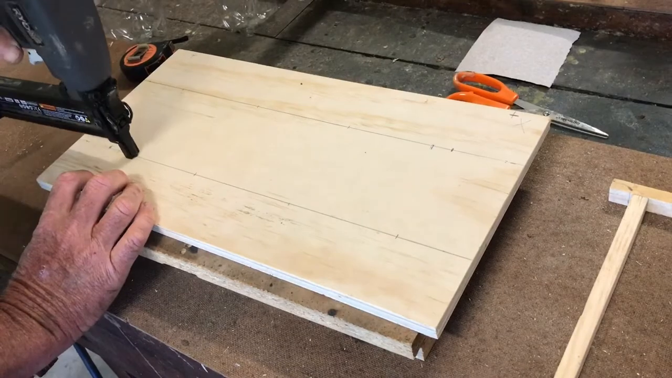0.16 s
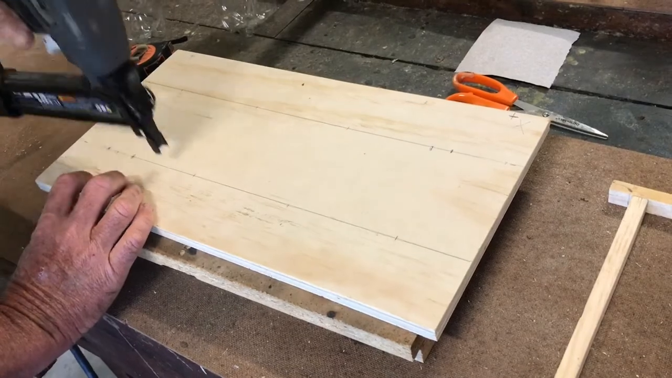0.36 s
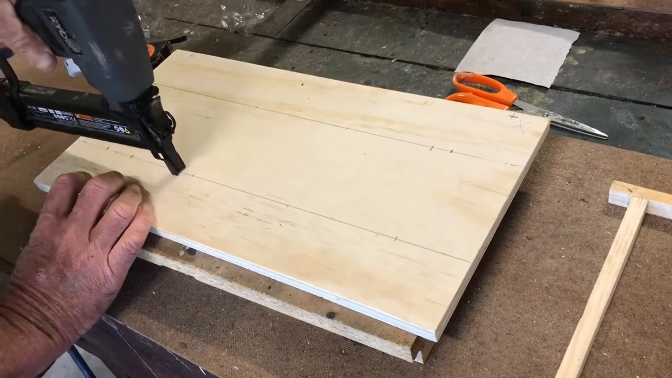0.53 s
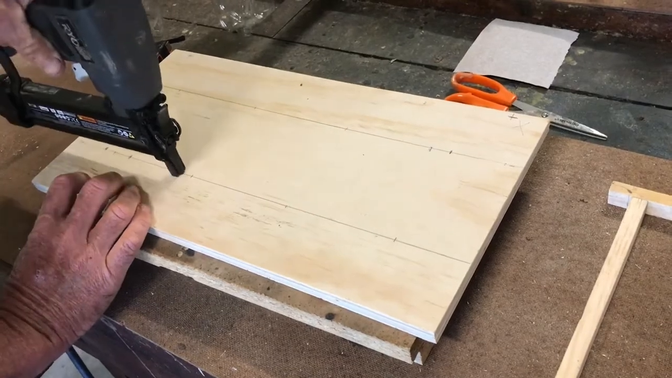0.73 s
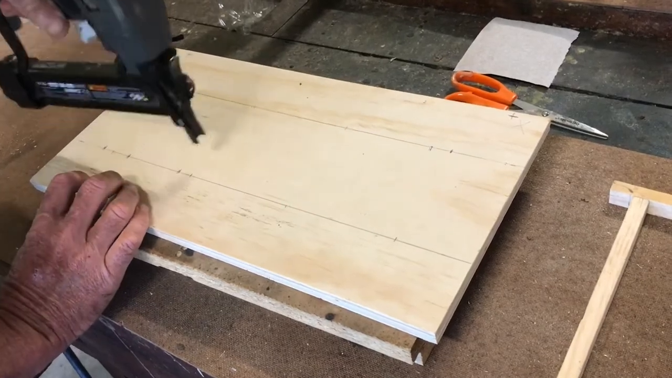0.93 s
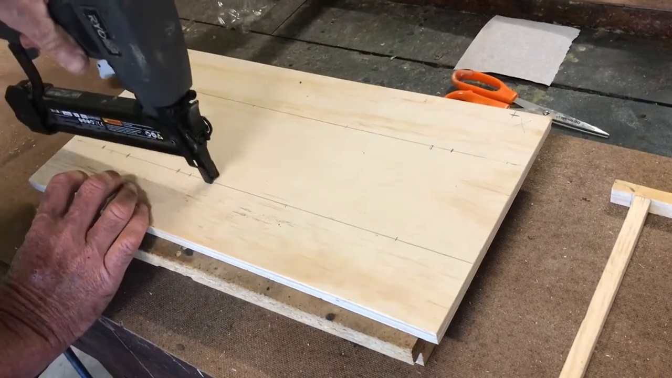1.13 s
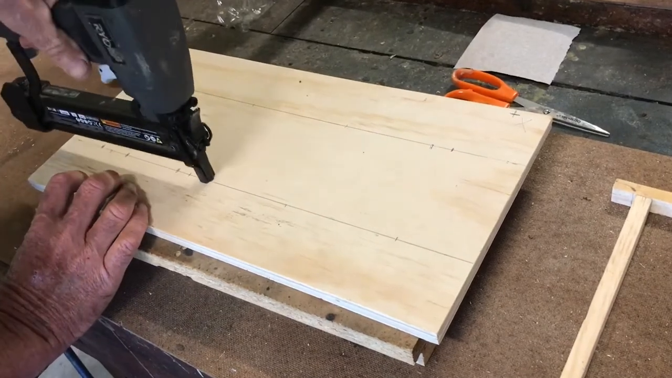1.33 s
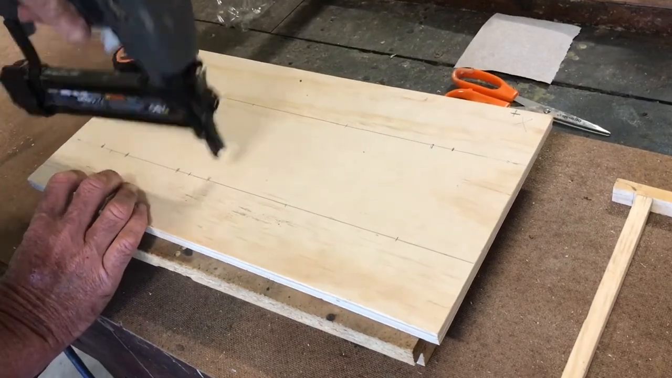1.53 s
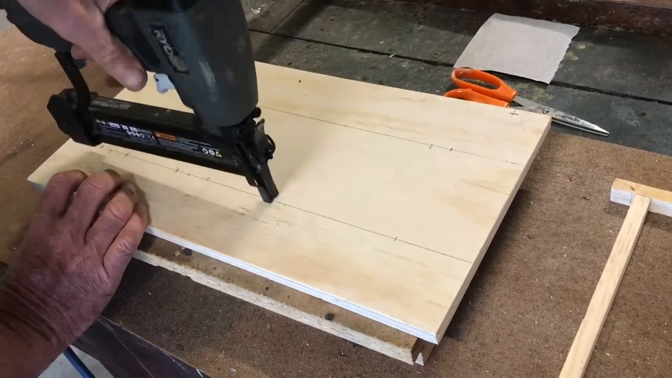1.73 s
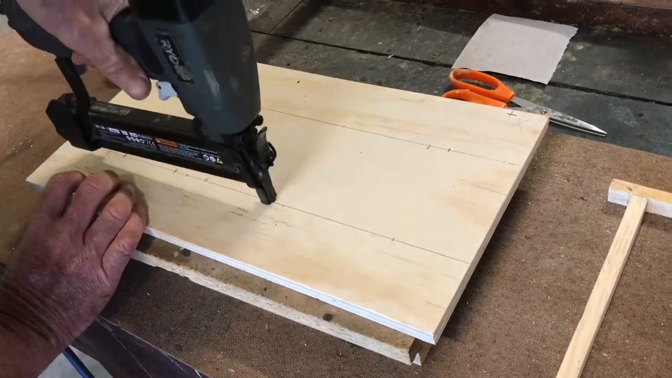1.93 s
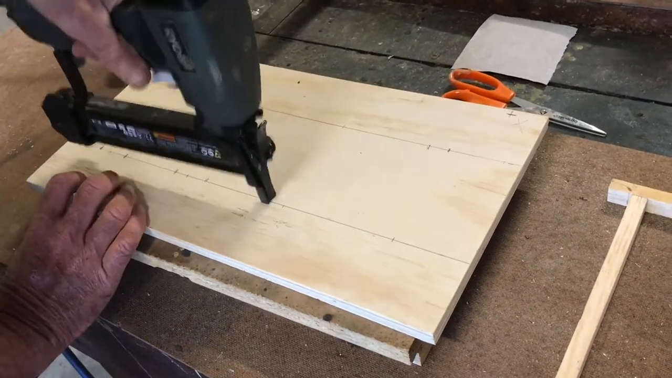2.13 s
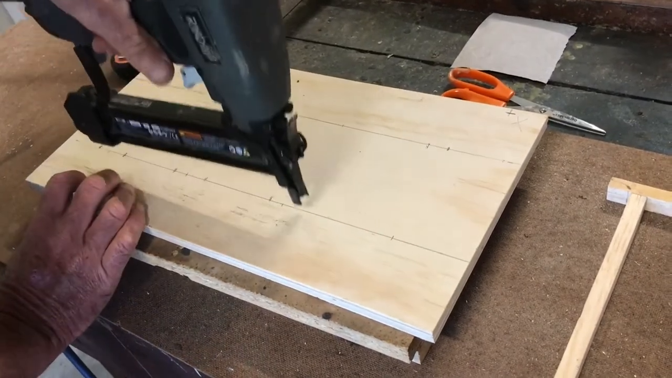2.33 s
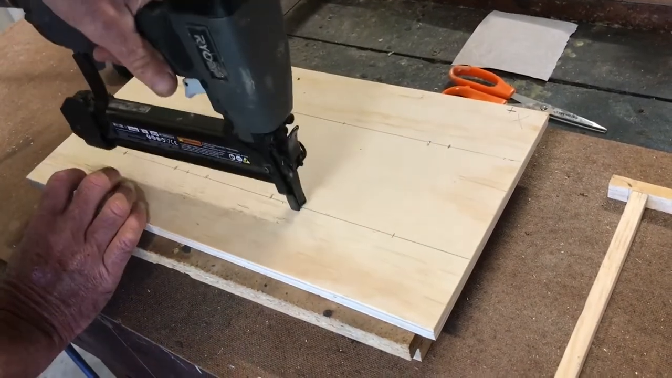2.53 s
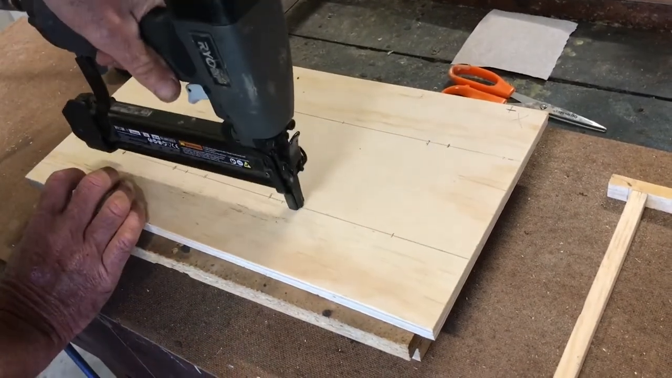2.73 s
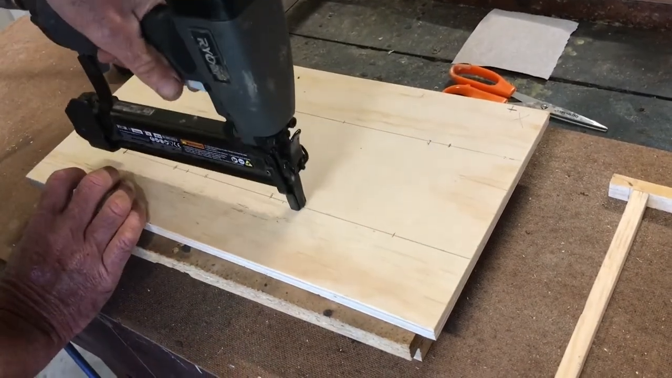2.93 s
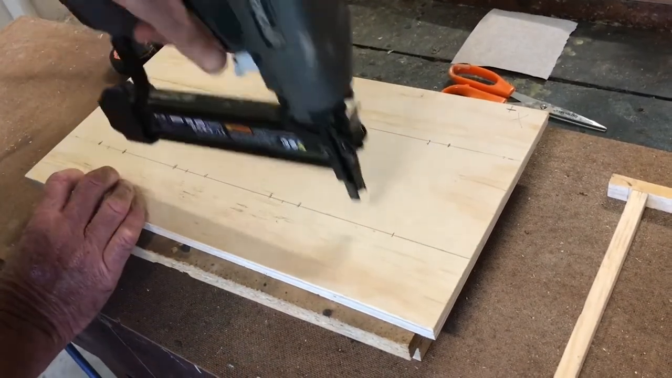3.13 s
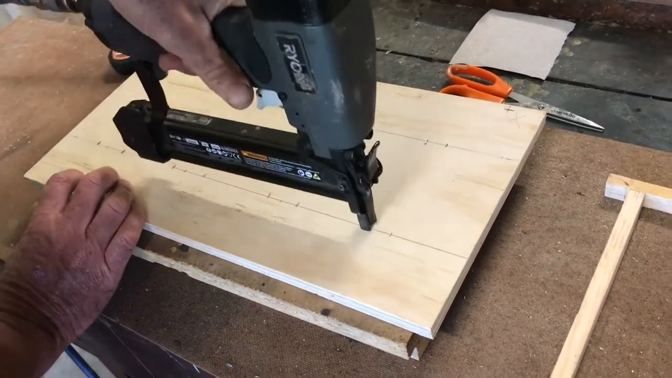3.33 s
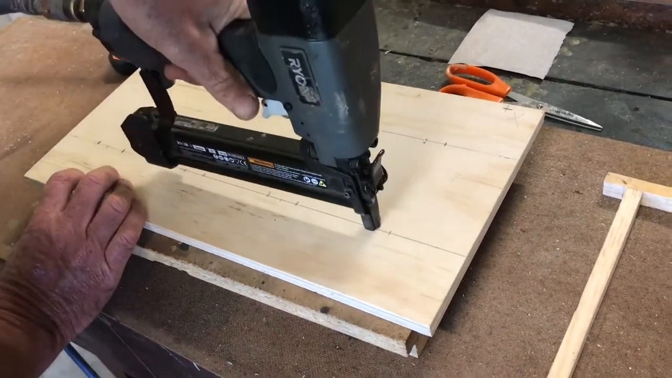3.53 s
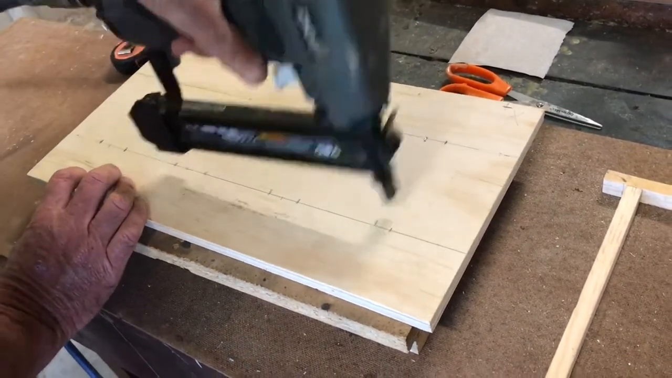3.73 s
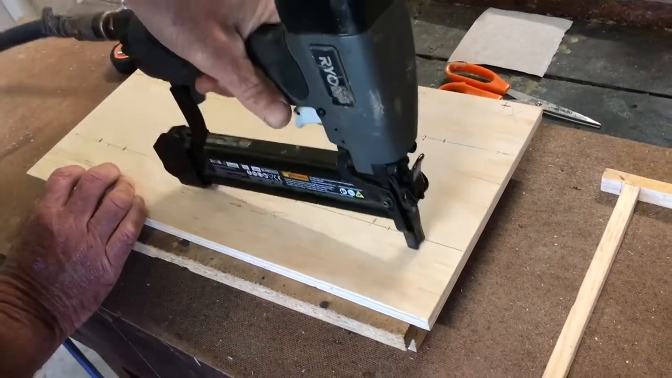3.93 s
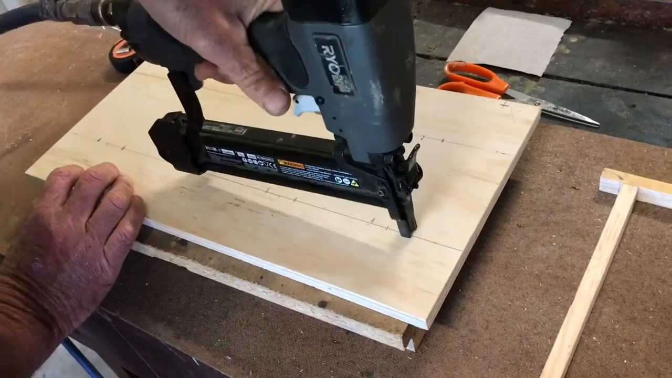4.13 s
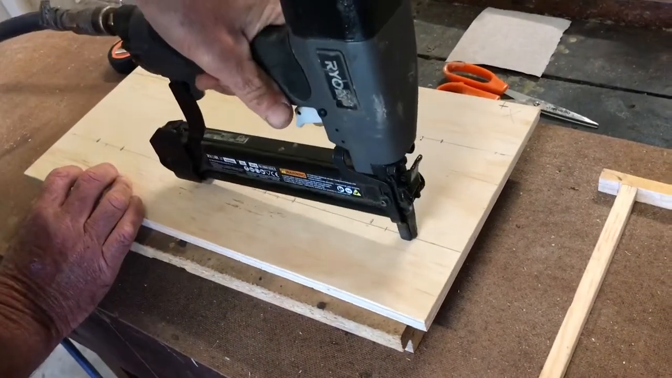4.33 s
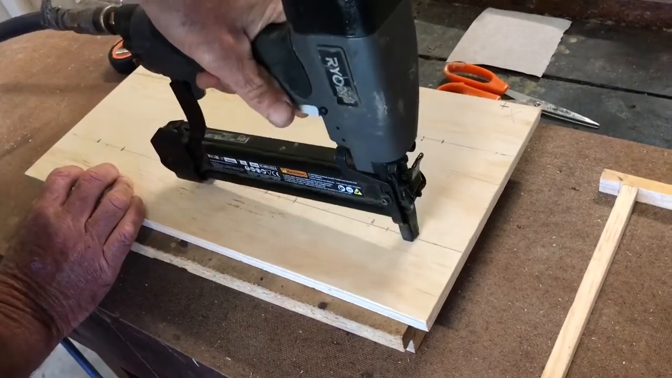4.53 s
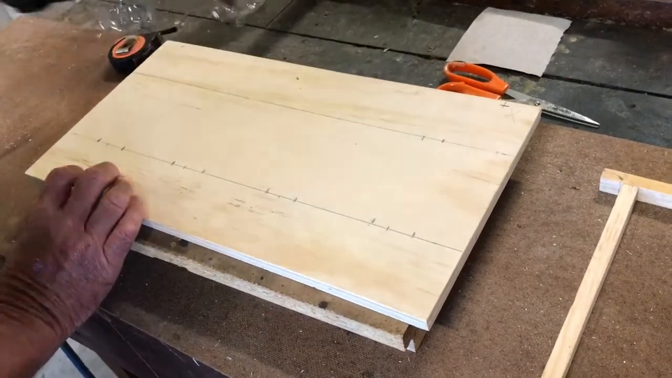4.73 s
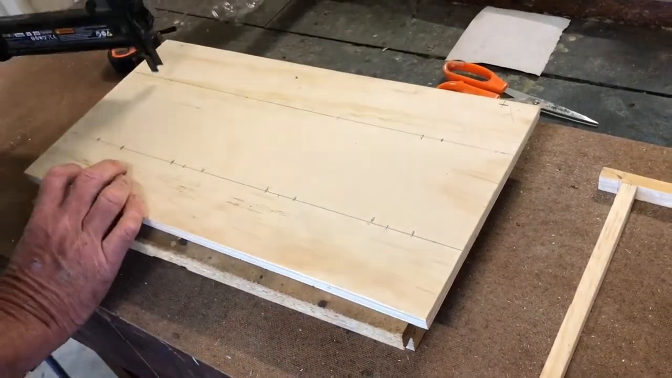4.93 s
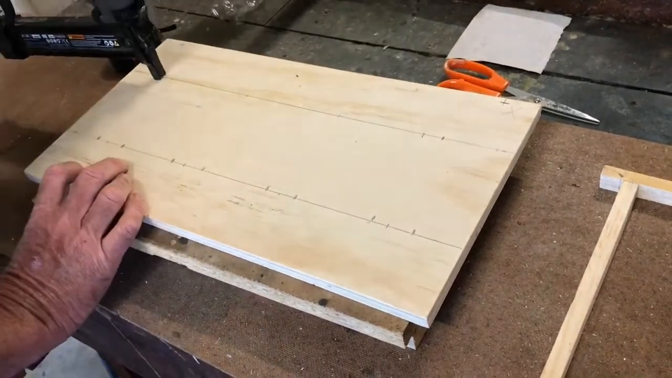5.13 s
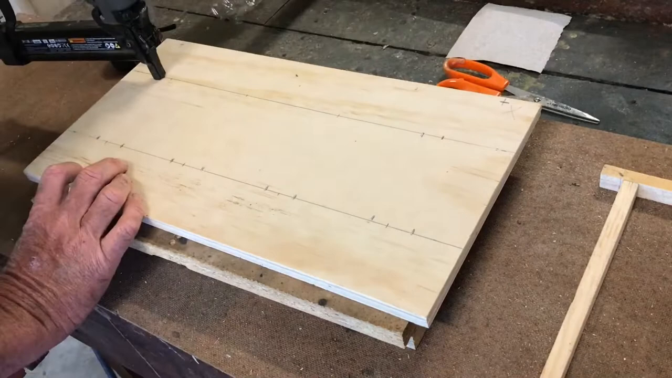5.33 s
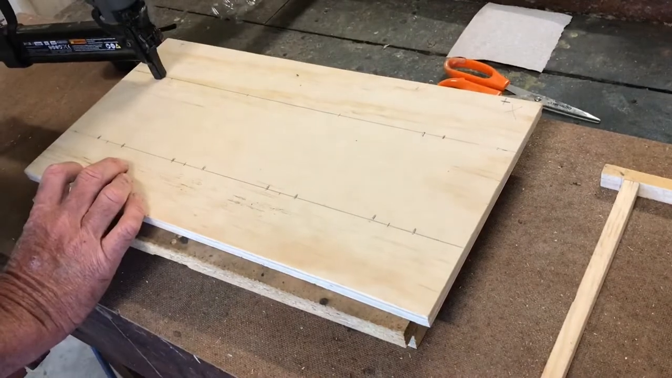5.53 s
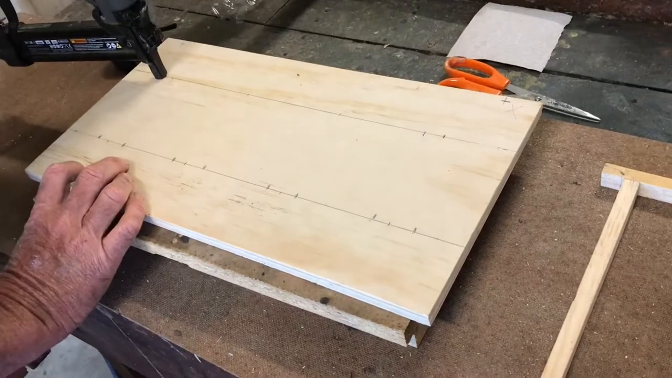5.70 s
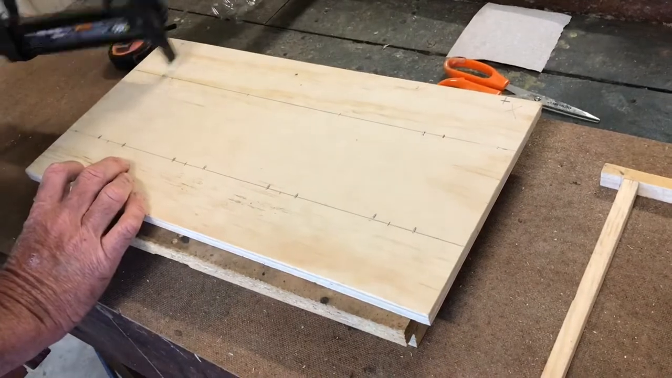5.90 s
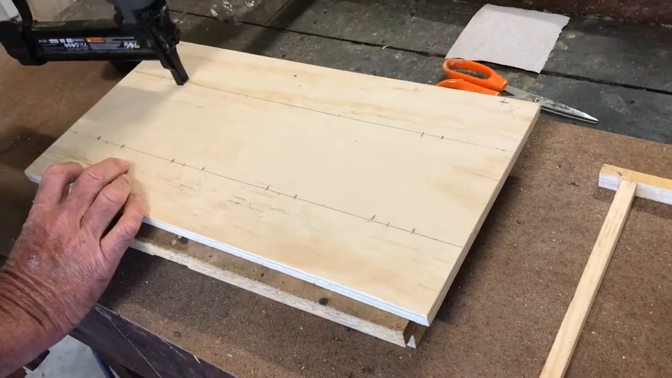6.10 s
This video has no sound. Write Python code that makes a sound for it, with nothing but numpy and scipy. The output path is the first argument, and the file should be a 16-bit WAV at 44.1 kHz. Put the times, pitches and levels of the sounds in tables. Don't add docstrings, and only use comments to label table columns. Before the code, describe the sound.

A pneumatic stapler fires eight loud, sharp shots into plywood, each a crack and air snap, with small metallic clicks between in a small workshop.

```python
import sys
import numpy as np
from scipy import signal
from scipy.fft import rfft, irfft, next_fast_len
from scipy.io import wavfile
from scipy.ndimage import uniform_filter1d

SR = 44100
rng = np.random.default_rng(int(sys.argv[2]) if len(sys.argv) > 2 else 0)


def linear_from_db(decibels):
    return 10 ** (np.asarray(decibels, float) / 20)


def wav_record(signal):
    frames = np.transpose(np.atleast_2d(signal))
    bounded = np.clip(frames, -1, 1)
    quanta = np.round(bounded * 32767).astype(np.int16)
    wavfile.write(sys.argv[1], SR, quanta)


N = 276066

# frequency in Hz, density in dB per Hz.
AIR_SPECTRUM = [(18, -82.5), (30, -54), (70, -25.5), (82, -20.5), (101, -7), (128, -21.5), (206, -14.5),
                (349, -25.5), (466, -23.5), (925, -36.5), (4620, -48.5), (5280, -49), (16400, -56.5)]
AIR_DB = -40.5 - 16.0
# frequency in Hz, width in Hz, level in dB.
HUM_LINES = [(98.6, 3, -64), (199.5, 4, -68), (244, 6, -74), (5200, 4, -90)]
DUCK_DB, DUCK_RETURN_S = 11, .15

# time of fastest motion in seconds, level in dB.
MOVES = [(0, -66.5), (.58, -66.5), (1.3, -71.5), (1.85, -70.5), (2.758, -67), (3.3, -72.5), (3.55, -64),
         (3.95, -68), (4.3, -67.5), (4.902, -71.5), (5.12, -70), (6.26, -62)]
# frequency in Hz, density in dB per Hz.
RUSTLE_SPECTRUM = [(410, -22), (700, 3), (1610, -20), (2000, -26.5), (2450, -3), (4900, -17), (6300, -10),
                   (15000, -34)]
MOVE_HALF_S, REST_DB, GRAIN_DB = 0.15, -78.5, 5

# time in seconds, peak in dB, centre in Hz, rebound delay in seconds, rebound peak in dB.
RELEASES = [(.0091, -36, 6300, .02, -75), (0.4353, -25, 1700, .023, -37.5), (0.5069, -24, 1520, .02, -61),
            (1.1277, -24, 5040, .0356, -39), (1.7313, -20, 2376, 0.01, -40.5),
            (2.4058, -22.5, 3680, .043, -38), (3.2265, -13.5, 3410, 0.032, -28.5),
            (3.9159, -33, 3880, 0.015, -39.5), (5.0103, -19.5, 3410, 0.041, -31.5),
            (6.1081, -20.5, 4800, .0256, -54.5)]
REBOUND_HZ, RELEASE_TREBLE_DB = 4250, -9
# time in seconds, peak in dB, centre in Hz.
TICKS = [(0.6063, -48, 2120), (2.6044, -56.5, 3760), (3.289, -22.5, 4270), (3.3073, -33, 6150),
         (3.3669, -45.5, 3620), (3.3879, -42, 2577), (3.4125, -41, 3030), (4.0953, -49.5, 2510),
         (4.809, -49, 1980), (4.9568, -47, 7000), (5.0406, -42, 4740)]
TICK_TREBLE_DB = -7
# time in seconds, click in dB, click centre in Hz, treble in dB, thud in dB.
LANDINGS = [(0.0625, -33.5, 2240, -39.5, -32), (0.6317, -30.5, 1526, -53.5, -24.5),
            (1.278, -23, 1500, -44, -19.5), (1.8562, -23.5, 1726, -51.5, -20),
            (2.6461, -29.5, 1900, -70, -23), (3.4666, -33.5, 3770, -41, -28.5),
            (4.2536, -31, 3350, -36.5, -29.5), (5.1553, -29, 4600, -42.5, -36.5),
            (6.2331, -23.5, 5240, -29.5, -29.5)]
TOUCH_LEAD_S, TOUCH_DB, TOUCH_HZ = .0064, -46.5, 3900
BOUNCE_S, BOUNCE_LOSS_DB, BOUNCE_HZ, BOUNCE_THUD_DB = .019, 17, 2900, -14
THUD_LAG_S, SCUFF_DB, SCUFF_DB_PER_THUD_DB = .001, -41.5, 0.33
SHIVER_DB, SHIVER_S = -26, .022
KNOCK_DB, NOSE_ROOM_DB = -37.5, -9
# frequency in Hz, density in dB per Hz.
CLICK_SPECTRUM = [(500, -31.5), (1300, -5.5), (3500, -2.5), (7500, -5), (10000, -23.5)]
TREBLE_SPECTRUM = [(7000, -30), (9000, -3), (12000, -4), (14500, -2), (16500, -5)]
SCUFF_SPECTRUM = [(300, -22), (600, 5.0), (1200, -4.5), (3000, -8), (7000, -26.5), (12000, -34.5)]

# frequency in Hz, level in dB, t60 in seconds.
TOOL_MODES = [(1450, -8, .014), (1720, -5, .014), (2100, 0, .013), (2580, -6, .012), (3300, -4, .014),
              (3700, -5, .012), (4640, -8, .012), (5150, -2, .014), (5600, -8, .014), (6300, -10, .012),
              (8300, -10, .01), (11700, -9, .012), (14200, -14, .008)]
# frequency in Hz, level in dB, t60 in seconds.
BOARD_MODES = [(128, -7, 0.22), (257, -9, 0.45), (185, -8.5, 0.12), (240, -7, .08), (315.9, -3.5, 0.1),
               (389.5, -11.5, .09), (471, -14, 0.08), (520, 0, 0.035), (655, 1, 0.04), (923, -18.5, 0.011),
               (1320, -9, 0.043)]
BOARD_SIGNS = [-1, 1, 1, 1, -1, 1, -1, 1, -1, 1, -1]
# frequency in Hz, density in dB per Hz.
BENCH_SPECTRUM = [(70, -29.5), (120, -5), (200, -1), (300, -0.5), (650, -6), (1000, -32.5)]
BENCH_DB, BENCH_S = -27, .025

# frequency in Hz, t60 in seconds, reflected over direct energy in dB.
ROOM_BANDS = [(120, 0.12, -17), (245, 0.34, -11.5), (504, 0.35, -15.5), (990, 0.13, -13.5),
              (1500, 0.47, -15), (2190, 0.39, -18), (3850, 0.35, -10.5), (7000, 0.43, -7),
              (10900, 0.25, -8.5), (15140, .42, -8.5)]

# time in seconds, blow in dB, valve lead in seconds.
SHOTS = [(.2212, -4, .0175), (.8338, -4, .0175), (1.4495, -2.5, .018), (2.0818, -5, .019),
         (2.9270, -4, .0178), (3.6484, -5, .019), (4.4998, -4, .0198), (5.8075, -5, .0195)]
# delay in seconds, crack in dB, push on the board from -1 to 1.
STROKE = [
    (0, 1, .7),
    (.0016, -7, -.9),
    (.0034, 1, .3),
    (.0052, -2, .6),
    (.0072, -5, -.95),
    (.0105, -11, .3),
    (.0135, -11, -.2),
    (.023, -13, .2),
]
# frequency in Hz, density in dB per Hz.
VALVE_SPECTRUM = [(290, -45), (500, -13), (2000, -9), (3500, -6.5), (5000, -1.5), (7500, -0.5),
                  (9550, -7.5), (11600, 0.5), (15700, -2.5), (16400, -28)]
# frequency in Hz, density in dB per Hz.
CRACK_SPECTRUM = [(410, -38), (700, -14), (3070, -5), (3740, -5), (4380, -4), (5130, -7), (9670, -14),
                  (12300, -14.5), (15400, -13), (16400, -38)]
# frequency in Hz, density in dB per Hz.
RATTLE_SPECTRUM = [(410, -37), (700, -7.5), (1070, -9.5), (2010, 2.5), (2990, -2.5), (4380, -3),
                   (9800, -14), (12600, -13.5), (15800, -24.5), (16400, -41)]
VALVE_DB, BOARD_DB = -17.5, -19.5

# time in seconds, first snap in dB, second snap in dB, thump in dB.
RETURNS = [(.2740, -1, -2.5, -13.5), (0.8739, -5, -20, -14), (1.5023, -6.5, -2.5, -13.5),
           (2.1450, -2.5, -6, -13.5), (2.994, -2, -3.5, -15.5), (3.7160, -2.5, -4, -16.5),
           (4.5699, -3, -4.5, -16.5)]
# frequency in Hz, density in dB per Hz.
EXHAUST_SPECTRUM = [(530, -49.5), (900, -7), (2440, -29.5), (5630, -0.5), (6210, 4.5), (9610, -4.5),
                    (13000, 4.5), (15800, -8), (16400, -14)]
# frequency in Hz, density in dB per Hz.
BLEED_SPECTRUM = [(700, -36), (1300, -17), (2200, -5.5), (4000, -1), (6000, -0.5), (9600, -6.5),
                  (15500, -7), (16400, -16)]
# frequency in Hz, density in dB per Hz.
SNAP_SPECTRUM = [(1000, -20), (3000, -3), (6000, 0), (9000, -6), (11700, -1), (16000, -12)]
# frequency in Hz, level in dB, t60 in seconds.
SPRING_MODES = [(1944, -42, .4), (1961, -45, .35), (11650, -43, .25)]
EXHAUST_LEAD_S, EXHAUST_DB, SNAP_GAP_S = .009, -17, .0071
THUMP_LEAD_S, THUMP_HZ = .0055, 180


def at_hz(points, hz, column=1):
    table = np.array(points)
    return np.interp(np.log(hz + 1), np.log(table[:, 0]), table[:, column])


def noise(spectrum):
    size = next_fast_len(N)
    gain = linear_from_db(at_hz(spectrum, np.fft.rfftfreq(size, 1 / SR)))
    shaped = irfft(rfft(rng.standard_normal(size)) * gain, size)[:N]
    return shaped / shaped.std()


def impulses(times_s, sizes):
    out = np.full(N, 1e-18)
    index = np.round(np.ravel(times_s) * SR).astype(int)
    np.add.at(out, np.clip(index, 0, N - 1), np.ravel(sizes))
    return out


def swell(blows, rise_s, fall_s):
    up, down = np.exp(-1 / (rise_s * SR)), np.exp(-1 / (fall_s * SR))
    decay = signal.lfilter([1], [1, -down], blows)
    return signal.lfilter([(1 - up) ** 2], [1, -2 * up, up * up], decay)


def ring(blows, hz, t60_s):
    r, w = linear_from_db(-60 / (t60_s * SR)), 2 * np.pi * hz / SR
    return signal.lfilter([0, np.sin(w)], [1, -2 * r * np.cos(w), r * r], blows)


def strike(modes, times_s, db, spread_db, centre_hz=None, narrow_db=0):
    times_s, db = np.ravel(times_s), np.ravel(db)
    luck = rng.standard_normal((len(times_s), len(modes)))
    out = np.zeros(N)
    for k, (hz, level_db, t60_s) in enumerate(modes):
        octaves_off = 0 if centre_hz is None else np.abs(np.log2(hz / centre_hz))
        mode_db = db + level_db + spread_db * luck[:, k] - narrow_db * octaves_off
        out += (-1) ** k * ring(impulses(times_s, linear_from_db(mode_db)), hz, t60_s)
    return signal.sosfilt(signal.butter(2, 900, "high", fs=SR, output="sos"), out)


def air_and_hum():
    out = linear_from_db(AIR_DB) * noise(AIR_SPECTRUM)
    for hz, width_hz, db in HUM_LINES:
        line = ring(rng.standard_normal(N), hz, 2.2 / width_hz)
        out += linear_from_db(db) * line / line.std()
    last_blows_s = [s for s, *_ in RETURNS] + [SHOTS[-1][0]]
    duck = swell(impulses(last_blows_s, np.ones(len(last_blows_s))), .03, DUCK_RETURN_S)
    return out * linear_from_db(-DUCK_DB * duck)


def rustle():
    t = np.arange(N) / SR
    motion = sum(linear_from_db(db) * np.exp(-((t - s) / MOVE_HALF_S) ** 2) for s, db in MOVES)
    grain = uniform_filter1d(rng.standard_normal(N), size=900) * np.sqrt(900)
    return (linear_from_db(REST_DB) + motion * linear_from_db(GRAIN_DB * grain)) * noise(RUSTLE_SPECTRUM)


def board(pushes):
    out = linear_from_db(BENCH_DB) * swell(np.abs(pushes), 0.006, BENCH_S) * noise(BENCH_SPECTRUM)
    for sign, (hz, db, t60_s) in zip(BOARD_SIGNS, BOARD_MODES):
        out += sign * linear_from_db(db) * ring(pushes, hz, t60_s)
    return out


def contacts():
    s, db, hz, delay_s, rebound_db = np.transpose(RELEASES)
    tick_s, tick_db, tick_hz = np.transpose(TICKS)
    land_s, click_db, click_hz, treble_db, _ = np.transpose(LANDINGS)
    each = np.ones_like(land_s)
    release = [s, db, hz, db + RELEASE_TREBLE_DB]
    rebound = [s + delay_s, rebound_db, REBOUND_HZ * np.ones_like(s), rebound_db + TICK_TREBLE_DB]
    tick = [tick_s, tick_db, tick_hz, tick_db + TICK_TREBLE_DB]
    landing = [land_s, click_db, click_hz, treble_db]
    touch = [land_s - TOUCH_LEAD_S, TOUCH_DB * each, TOUCH_HZ * each, (TOUCH_DB + TICK_TREBLE_DB) * each]
    bounce = [land_s + BOUNCE_S, click_db - BOUNCE_LOSS_DB, BOUNCE_HZ * each, treble_db - BOUNCE_LOSS_DB]
    return np.hstack([release, rebound, tick, landing, touch, bounce])


def nose():
    s, peak_db, centre_hz, treble_db = contacts()
    body = strike(TOOL_MODES, s, peak_db - 4, spread_db=3.0, centre_hz=centre_hz, narrow_db=9)
    tick = swell(impulses(s, linear_from_db(peak_db - 7)), .0001, .0012)
    shiver = swell(impulses(s, linear_from_db(peak_db + SHIVER_DB)), .002, SHIVER_S)
    click = (tick + shiver) * noise(CLICK_SPECTRUM)
    treble = swell(impulses(s, linear_from_db(treble_db)), .0001, .0014) * noise(TREBLE_SPECTRUM)
    knock = impulses(s, linear_from_db(peak_db + KNOCK_DB))

    land_s, *_, thud_db = np.transpose(LANDINGS)
    land_s = land_s + THUD_LAG_S
    push_db = thud_db - 31.5
    pushes = impulses([land_s, land_s + BOUNCE_S], -linear_from_db([push_db, push_db + BOUNCE_THUD_DB]))
    thud = swell(pushes, .0004, .0009)
    scuffs = impulses(land_s, linear_from_db(SCUFF_DB + SCUFF_DB_PER_THUD_DB * thud_db))
    scuff = swell(scuffs, 0.0012, 0.03) * noise(SCUFF_SPECTRUM)
    return body + click + treble + board(thud + knock) + scuff


def room(dry):
    t = np.arange(SR) / SR
    edges_hz = 70 * 2 ** np.arange(0, 8.1, .5)
    white = rng.standard_normal((2, SR))
    tail = 0
    for k, (low, high) in enumerate(zip(edges_hz, edges_hz[1:])):
        band = signal.sosfilt(signal.butter(2, [low, high], "band", fs=SR, output="sos"), white[k % 2])
        hz = np.sqrt(low * high)
        t60_s = at_hz(ROOM_BANDS, hz)
        decay = linear_from_db(at_hz(ROOM_BANDS, hz, column=2) - 60 * t / t60_s)
        unit_energy = np.sqrt(2 * np.log(1000) / (t60_s * SR))
        tail = tail + band * decay * unit_energy
    tail = tail * (1 - np.exp(-(t / .004) ** 2))
    return signal.fftconvolve(dry, tail)[:N]


def drive():
    s, blow_db, lead_s = np.array(SHOTS).T[:, :, None]
    delay_s, crack_db, push = np.array(STROKE).T
    opened = impulses(s - lead_s, np.ones_like(s))
    valve = linear_from_db(VALVE_DB) * swell(opened, .0024, .005) * noise(VALVE_SPECTRUM)
    luck = rng.standard_normal((len(SHOTS), 2, len(STROKE)))
    times_s = s + delay_s + .0003 * luck[:, 0] * (delay_s > 0)
    db = blow_db + crack_db + 1.5 * luck[:, 1]
    cracks = swell(impulses(times_s, linear_from_db(db - 2.5)), .00006, .0008) * noise(CRACK_SPECTRUM)
    rattle = swell(impulses(s, linear_from_db(blow_db - 11)), 0.0025, 0.024) * noise(RATTLE_SPECTRUM)
    metal = strike(TOOL_MODES, times_s, db - 14.5, spread_db=7.5)
    pushes = impulses(s + delay_s, push * np.ones_like(s))
    return valve + cracks + rattle + metal + linear_from_db(BOARD_DB) * board(pushes)


def piston_return():
    s, snap_db, second_db, thump_db = np.transpose(RETURNS)
    open_s, second_s = s - EXHAUST_LEAD_S, s + SNAP_GAP_S
    opened = impulses(open_s, linear_from_db(EXHAUST_DB) * np.ones_like(s))
    burst = linear_from_db(-1) * swell(opened, .0003, .006)
    bleed = linear_from_db(-10.5) * swell(opened, 0.0021, 0.033)
    jet = burst * noise(EXHAUST_SPECTRUM) + bleed * noise(BLEED_SPECTRUM)
    dip = -ring(impulses(s - THUMP_LEAD_S, linear_from_db(thump_db + 2.5)), THUMP_HZ, 0.028)
    port_pop = ring(impulses(open_s, linear_from_db(thump_db - 3.0)), 430, 0.039)

    snaps = impulses(s, linear_from_db(snap_db + 1)) + impulses(second_s, linear_from_db(second_db - 2))
    bright = swell(snaps, .00004, .0005) * noise(SNAP_SPECTRUM)
    first = strike(TOOL_MODES, s, snap_db - 11.5, spread_db=0.0, centre_hz=5980, narrow_db=4.5)
    second = strike(TOOL_MODES, second_s, second_db - 6.0, spread_db=3.5, centre_hz=2440, narrow_db=7)
    spring = strike(SPRING_MODES, second_s, np.zeros(len(s)), spread_db=1.2)
    pushed_board = board(impulses(second_s, linear_from_db(second_db - 30.0)))
    return jet + dip + port_pop + bright + first + second + spring + pushed_board


def scene():
    background = air_and_hum() + rustle()
    small = nose()
    shots = drive() + piston_return()
    reflections = room(shots + linear_from_db(NOSE_ROOM_DB) * small)
    return (shots + small + reflections + background)[None]


def band_limit(x):
    return signal.sosfilt(signal.butter(12, 17140, fs=SR, output="sos"), x)


def record(dry):
    x = signal.sosfilt(signal.butter(2, 66, "high", fs=SR, output="sos"), dry)
    x = .97 * np.tanh(x / .97)
    x = signal.sosfilt(signal.cheby2(12, 26, 16250, fs=SR, output="sos"), x)
    return band_limit(x)


dry = scene()
out = record(dry)
wav_record(out)
```